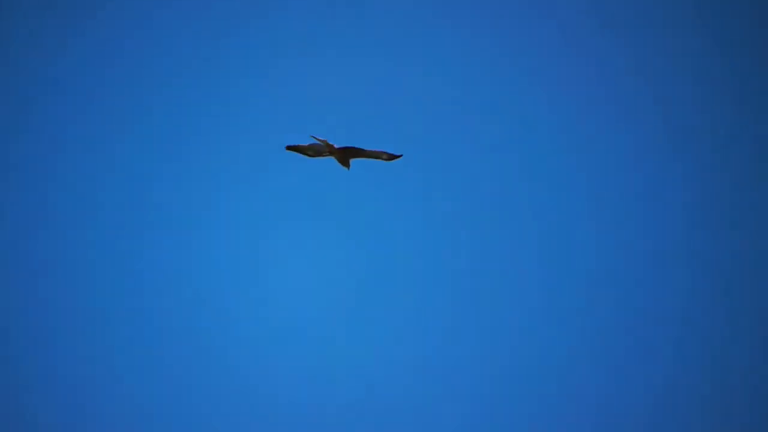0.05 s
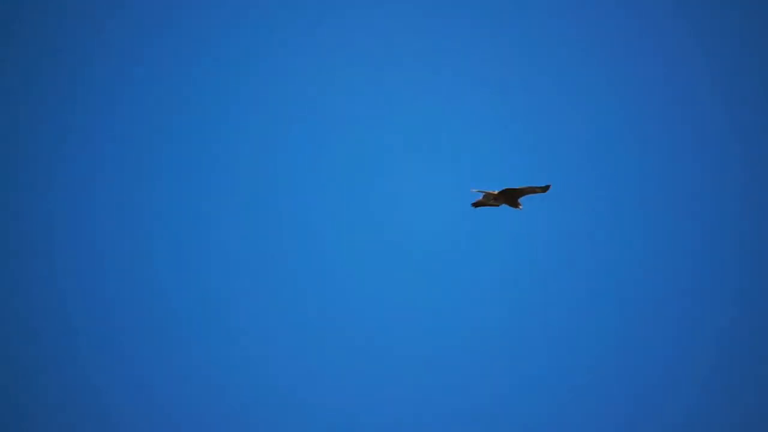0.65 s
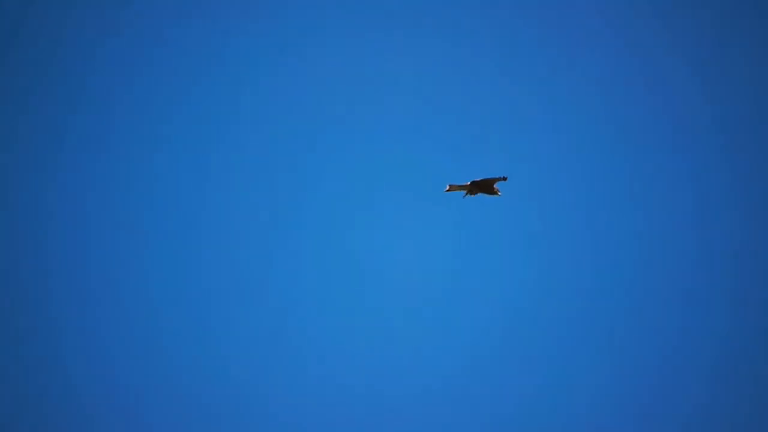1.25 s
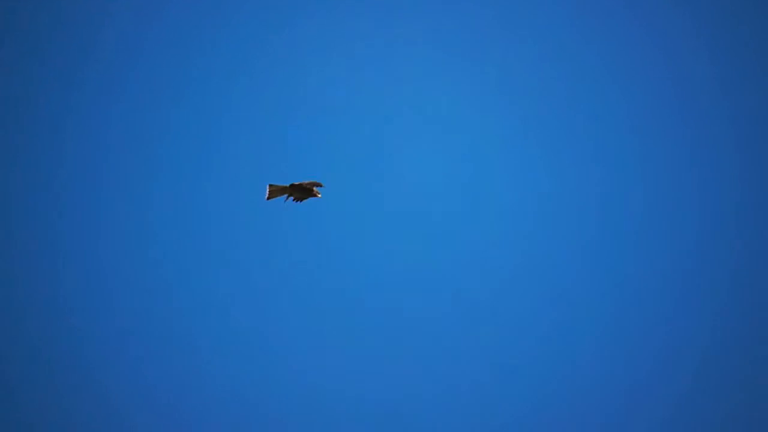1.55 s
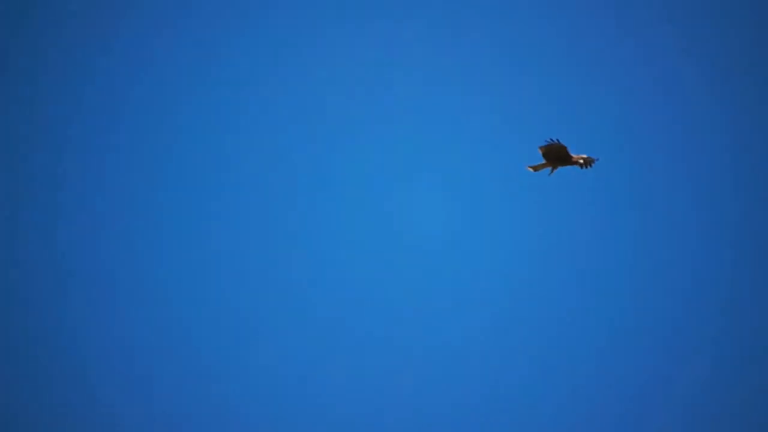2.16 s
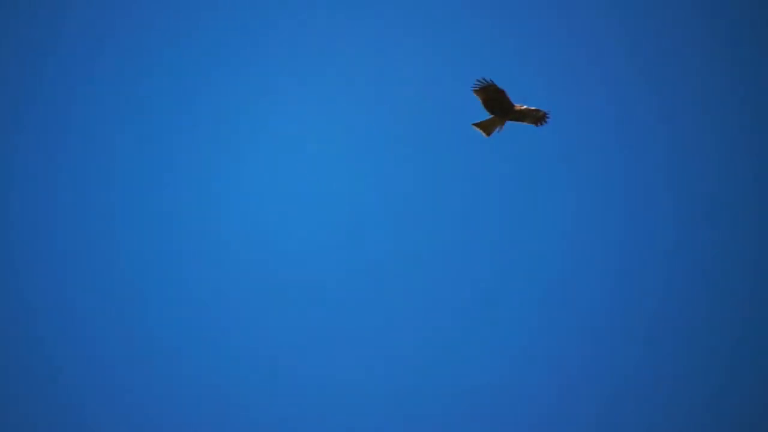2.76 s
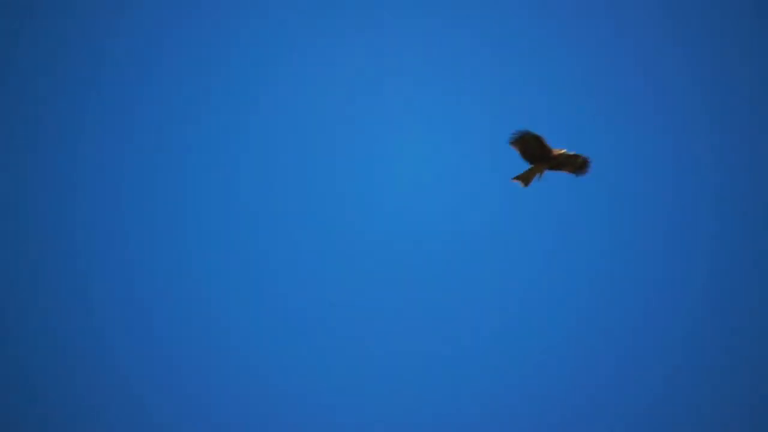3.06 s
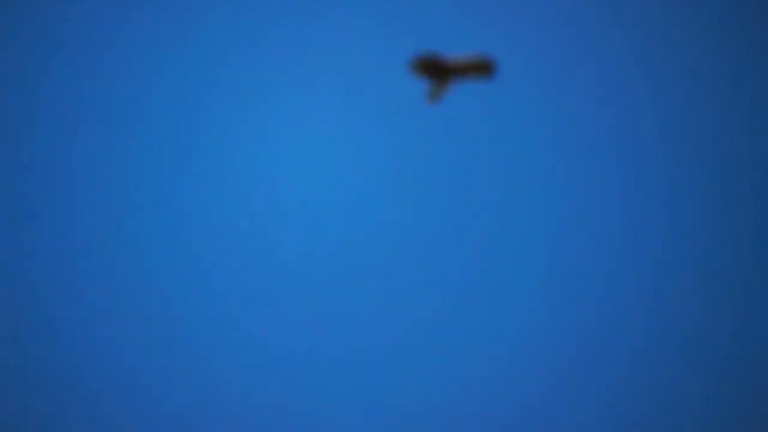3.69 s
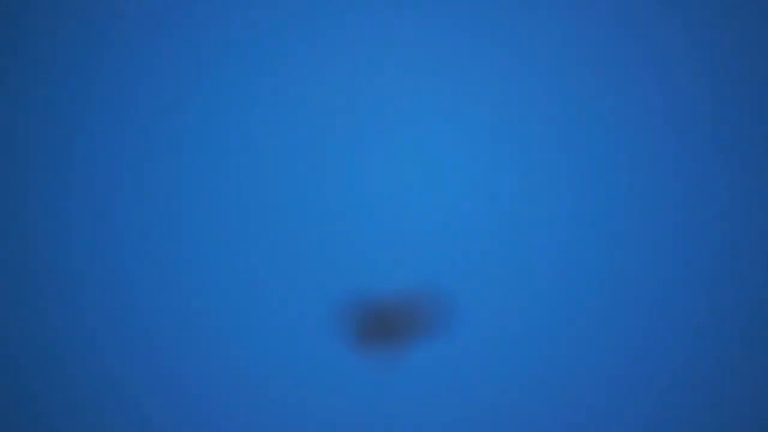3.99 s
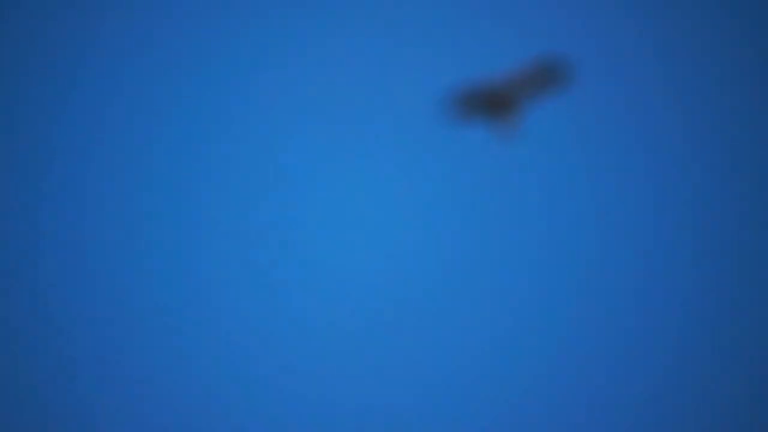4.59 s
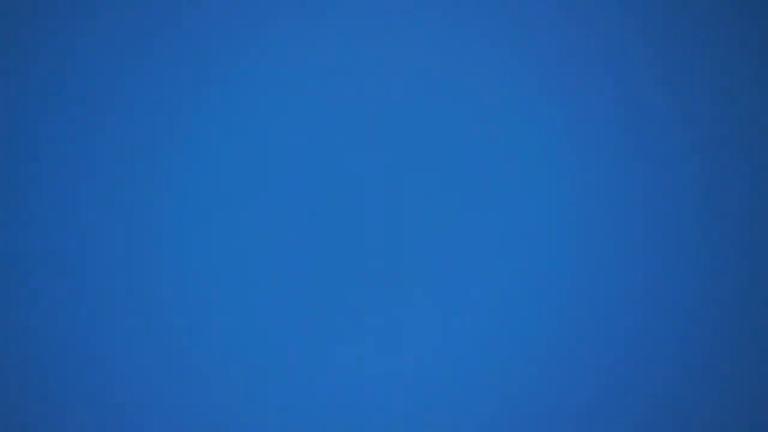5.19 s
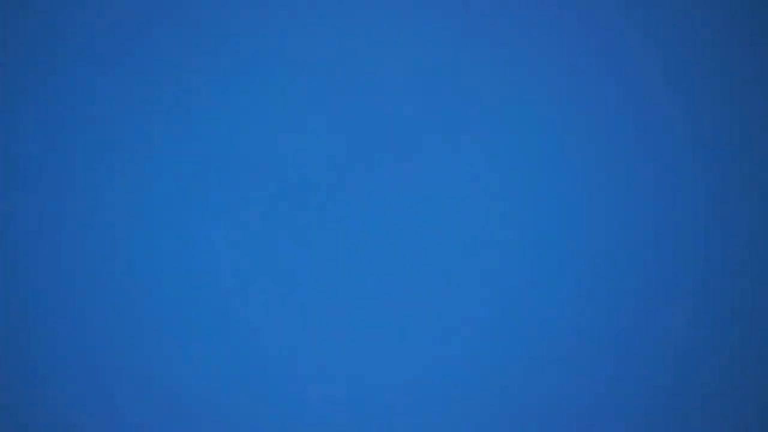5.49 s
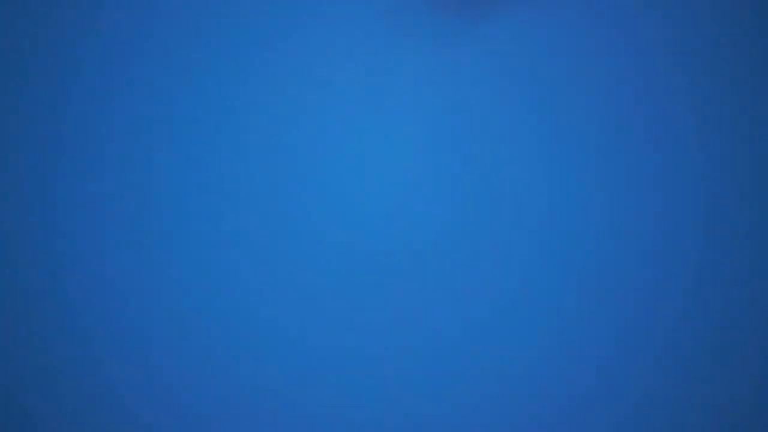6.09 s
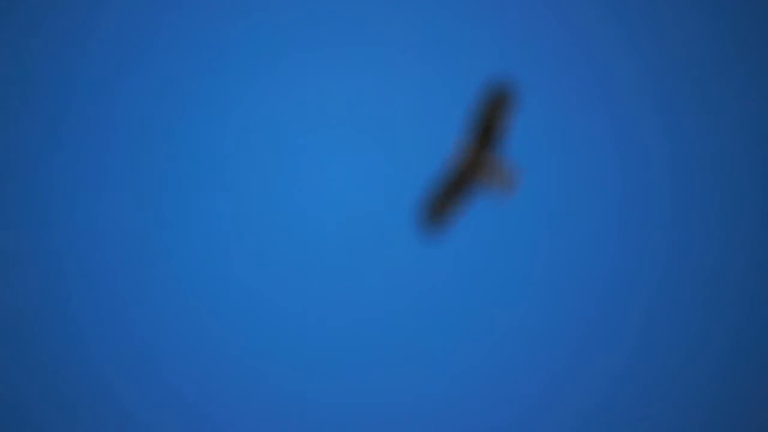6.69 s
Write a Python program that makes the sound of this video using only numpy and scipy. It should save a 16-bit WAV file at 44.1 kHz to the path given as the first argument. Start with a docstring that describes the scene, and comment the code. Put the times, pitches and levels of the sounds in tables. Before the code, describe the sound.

Strong wind buffets the microphone outdoors with a low, crackling roar that surges and dips in uneven gusts.

```python
"""A low, crackling roar: strong wind buffets the microphone of a camera under an open sky.
Turbulent eddies rush and knock at the port, brightening in each gust, over a deep heave of air.
The highest pressure peaks overload the input and are clipped, which makes the crackle.
For a moment, vortices shed from an edge whistle thinly.
The recorder notches out mains hum and passes only a narrow band."""
import sys
import numpy as np
from scipy import signal
from scipy.fft import rfft, irfft
from scipy.io import wavfile
from scipy.ndimage import uniform_filter1d, minimum_filter1d

SR = 44100
rng = np.random.default_rng(int(sys.argv[2]) if len(sys.argv) > 2 else 0)


def master(y):
    """Save y as 16-bit WAV."""
    cut = np.clip(np.atleast_2d(y).T, -1, 1)
    pcm = np.round(cut * 32767)  # scale
    wavfile.write(sys.argv[1], SR, pcm.astype(np.int16))


N = 302085
TIME = np.arange(N) / SR

# Wind strength, heard as the rush of small eddies: time_s, relative_level_db
WIND = [(0, -26), (0.5, -24.5), (0.68, -30), (1.17, -26), (1.32, -27), (1.6, -29.5), (1.85, -23),
        (2.3, -25.5), (2.52, -29.5), (2.68, -25.5), (3.1, -38), (3.95, -37.5), (4.5, -29), (4.85, -32),
        (5.3, -26), (5.85, -28), (6.25, -29), (6.85, -25)]
# How squarely the wind meets the port: time_s, share_0_to_1
HEAD_ON = [(0, 1), (1.0, 0.88), (2.4, 0.96), (3.0, 0.7), (3.6, 0.12), (4.5, 0.16), (5.5, 0.1), (6.85, 0.05)]
# Gusts at the port: middle_s, length_s, roar_gain_db, rush_gain_db
GUSTS = [(.652, 0.02, 6, 0.5), (.72, 0.1, 2.5, 6), (1.02, 0.041, 2, 5), (1.15, 0.057, 3.5, 2),
         (1.21, 0.025, 3.5, 2), (1.49, 0.031, 5.5, 0.5), (1.81, 0.051, 1.5, 3), (1.92, .07, 1, 0.5),
         (2.045, 0.08, 2.5, 2.5), (2.19, .07, -3.5, 3.5), (2.315, 0.07, 4, 7.5), (2.435, 0.042, -3.5, 1.5),
         (2.803, 0.052, 0, -4), (2.924, 0.024, 7, 6), (3.014, 0.05, -1, 6), (3.18, 0.12, -1, 1.5),
         (3.43, 0.068, 3, 4.5), (3.793, 0.025, 0, 9), (3.865, 0.057, 0, 8.5), (3.982, 0.017, 5, 0.5),
         (4.046, 0.022, 2.5, 5.5), (4.175, 0.18, -3.5, 6), (4.225, 0.07, 8.5, 2), (4.436, 0.055, 2.5, 3.5),
         (4.55, 0.051, -1, 3), (4.663, 0.047, 6, 7.5), (4.909, 0.049, 5, 12), (5.275, 0.053, 7, 4),
         (5.372, 0.021, 6, 3), (5.487, 0.039, 2, 5), (5.553, 0.021, 0, 3.5), (5.72, 0.1, -4, 6.5),
         (5.87, 0.049, 0, 3.5), (5.965, 0.025, -2.5, 6), (6.175, 0.018, -1.5, 3.5), (6.228, 0.02, 1, 6.5),
         (6.436, 0.057, -2, 4), (6.51, 0.032, 2.5, 1), (6.61, 0.066, -4, 2), (6.688, 0.027, -1.5, 4.5),
         (6.79, 0.26, 0.5, 1.5)]
# Brief dips and lifts in the wind's roar and rush (a negative loss is a lift):
# middle_s, length_s, roar_loss_db, rush_loss_db
DIPS_AND_LIFTS = [(.588, 0.022, 0, 5), (.669, 0.023, 5.5, 9.5), (.88, 0.13, 5.5, 1), (1.068, 0.049, 1, 2),
                  (1.255, 0.032, 2, 9.5), (1.544, 0.046, 1.5, 3.5), (2.135, .04, 0.5, 1),
                  (2.363, 0.051, 6, 1), (2.55, 0.044, 7.5, 3.5), (2.864, 0.067, 6.5, 0),
                  (2.958, 0.049, 9.5, 0.5), (3.36, 0.15, 4, 3.5), (3.519, 0.038, 11, 0),
                  (3.72, 0.072, 1.5, 5), (3.902, 0.035, 4, 0), (4.014, 0.026, 4, 13),
                  (4.101, 0.059, 2, 2.5), (4.29, 0.15, 5, 2), (4.765, 0.077, 2, -1.5),
                  (4.975, 0.12, 1.5, 6), (5.315, 0.056, 2.5, 0.5), (5.42, 0.026, 5.5, -2),
                  (5.615, 0.084, -1, 4), (6.025, 0.033, 3.5, 0.5), (6.083, 0.18, 1, 21.5),
                  (6.205, .02, -4, 5), (6.248, .022, -1, 0), (6.36, 0.027, 6, 7.5), (6.565, 0.021, 0, 6.5),
                  (6.648, 0.05, 5, 2.5), (6.84, 0.035, 3, 0.5)]
# Spectra of large, small and finest eddies: frequency_hz, relative_density_db
ROAR_GLANCING_COLOUR = [(20, -32.5), (35, -35.5), (60, -4), (100, -3), (150, 0.5), (220, 2.5), (320, 0),
                        (500, -6), (750, -12), (1000, -22), (2000, -46), (3000, -74.5), (7000, -78)]
ROAR_HEAD_ON_COLOUR = [(20, -26.5), (50, -9), (100, -9.5), (160, -3), (230, -1), (370, -1.5), (500, -7.5),
                       (750, -15.5), (1000, -22.5), (2000, -43), (3000, -69), (7000, -92.5)]
RUSH_GLANCING_COLOUR = [(150, -20.5), (350, 1), (550, 9.5), (800, 6.5), (1100, 3), (1500, -5.5),
                        (2000, -14.5), (3000, -43.5), (4500, -50.5), (7000, -59.5)]
RUSH_HEAD_ON_COLOUR = [(150, -34.5), (350, 1.5), (550, 4), (800, 2), (1100, -1), (1500, -6), (2000, -15.5),
                       (3000, -44), (4500, -55), (7000, -60.5)]
FIZZ_COLOUR = [(1000, -3.5), (2000, 10.5), (2600, 5), (3500, -6.5), (5000, -20.5), (7000, -42.5)]
# Base overload threshold, lower in a head-on wind: time_s, ceiling_db
CEILING = [(0, -10), (.5, -11.5), (.9, -9.8), (1.3, -10), (1.6, -10.5), (2.0, -8.5), (2.35, -11), (2.7, -9),
           (3.0, -8.5), (3.4, -3.5), (4.45, -8), (4.62, -7), (5.15, -6), (5.95, -5.5), (6.15, -2.5),
           (6.28, -2.5), (6.42, -7), (6.85, -6)]
# Slow shoves of air on the diaphragm: middle_s, length_s, gain_db
SHOVES = [(.25, 0.92, 5), (2.88, 0.15, -2.5), (3.85, 0.12, 6), (4.45, 0.11, 20.5), (4.66, 0.2, 10),
          (5.2, 0.13, 25)]
# Spectra of the heave, open air and faint noise near 12 kHz: frequency_hz, relative_density_db
HEAVE_COLOUR = [(1, -10.5), (4, -2), (10, -11.5), (20, -11.5), (35, -23), (60, -20), (150, -40.5),
                (400, -59), (1000, -110)]
AIR_COLOUR = [(200, 7.5), (2000, -1.5), (4000, -4), (7000, -17.5)]
HISS_COLOUR = [(8300, 0.5), (10000, -13), (12000, 1.5), (14000, -12.5)]
# The loudest overload pops: start_s, relative_treble_peak_db
POPS = [(0.137, -33), (0.172, -31), (0.21, -30), (0.458, -32), (0.491, -27.5), (0.608, -32), (0.639, -33.5),
        (0.708, -31), (1.949, -32), (2.325, -27.5), (2.414, -33.5), (2.4272, -36), (2.436, -32.5),
        (2.518, -34), (2.664, -38), (2.731, -33), (2.744, -38), (2.757, -39.5), (2.763, -36), (2.814, -36),
        (2.914, -36), (2.9235, -38), (3.0893, -41.5), (3.0966, -40), (3.1352, -38), (3.2443, -38),
        (3.558, -42), (3.6897, -37.5), (3.8499, -34.5), (3.872, -38), (3.938, -37.5), (3.99, -47.5),
        (4.153, -48.5), (4.184, -35.5), (4.225, -39.5), (4.2443, -38), (4.3827, -37), (4.442, -35.5),
        (4.446, -34.5), (4.5514, -41.5), (4.563, -36), (4.5782, -37.5), (4.603, -33.5), (4.624, -37),
        (4.6551, -38.5), (4.664, -35.5), (4.672, -38.5), (4.69, -38), (4.7812, -37.5), (4.886, -43),
        (4.9188, -35.5), (4.9883, -36.5), (5.025, -38.5), (5.041, -41), (5.051, -39.5), (5.063, -36),
        (5.114, -37.5), (5.1966, -37), (5.236, -39), (5.245, -40), (5.257, -35.5), (5.266, -39),
        (5.273, -33.5), (5.28, -46.5), (5.3692, -29.5), (5.414, -38), (5.47, -39), (5.482, -36.5),
        (5.4913, -34), (5.555, -37.5), (5.558, -40.5), (5.617, -46), (5.6823, -38), (5.72, -36.5),
        (5.756, -35.5), (5.867, -35), (5.925, -37.5), (5.9871, -37), (5.993, -39.5), (6.2188, -40),
        (6.223, -41.5), (6.263, -43), (6.2878, -33), (6.338, -42), (6.398, -35), (6.5085, -36),
        (6.522, -38.5), (6.69, -34), (6.695, -37.5), (6.758, -35.5), (6.804, -38), (6.835, -39)]
# Single eddies striking the port: time_s, relative_peak_db, pitch_hz
KNOCKS = [(0.646, -15, 684), (1.077, -4.5, 508), (1.341, -7.5, 530), (1.564, -12.5, 520),
          (2.262, -9.5, 777), (3.805, -4.5, 720), (3.973, -13.5, 486), (4.044, -12, 400), (6.16, -13, 514),
          (6.74, -12.5, 621)]
# Short whistles on an edge: middle_s, length_s, top_pitch_hz, relative_level_db
EDGE_TONES = [(2.508, 0.13, 2250, -42.5), (2.873, 0.25, 2216, -44), (3.01, 0.13, 2144, -48.5),
              (3.131, 0.17, 2225, -42.5), (3.242, 0.16, 2305, -41.5), (3.355, .12, 2140, -47.5),
              (3.467, 0.06, 2240, -46), (3.588, 0.02, 1980, -39), (3.794, 0.048, 2200, -41),
              (4.037, 0.025, 2020, -40), (4.32, .02, 2080, -43), (4.365, 0.02, 2030, -40)]
# Treble lift of the recorder: frequency_hz, gain_db
RESPONSE = [(1500, 0), (3000, 2), (4200, 2.5), (6500, 2.5)]
# Right channel relative to left: frequency_hz, gain_db, phase_lead_rad
RIGHT_CHANNEL = [(11, -13.7, .4), (22, -11.4, .65), (43, -5.7, .71), (86, -1.6, .42), (150, -.6, .27),
                 (300, -.3, .15), (420, -.15, .11), (700, 0, 0), (2000, 0, 0), (2800, 0, -.07),
                 (6500, 0, -.13)]
# Mains hum filter: centre_hz, width_hz
HUM_NOTCHES = [(57.5, 51), (119.5, 28.5), (179, 19.3)]


def gain_of(db):
    """Decibels to amplitude."""
    return 10 ** (np.asarray(db) / 20)


def unit_rms(x):
    """Normalisation to an rms of 1."""
    return x / np.sqrt(np.mean(x ** 2) + 1e-20)


def curve(rows):
    """Linear interpolation of (time_s, value) rows."""
    return np.interp(TIME, *np.transpose(rows))


def add(mix, start_s, sound):
    """Superposition of a sound on the mix."""
    part = mix[max(round(start_s * SR), 0):][:len(sound)]
    part += sound[:len(part)]


def coloured(x, colour):
    """Spectral shaping by (frequency_hz, gain_db) rows."""
    hz, (row_hz, db) = np.fft.rfftfreq(N, 1 / SR), np.transpose(colour)
    return irfft(rfft(x) * gain_of(np.interp(np.log(hz + 1), np.log(row_hz + 1), db)), N)


def noise(colour):
    """Gaussian noise of rms 1 with the given spectrum."""
    return unit_rms(coloured(rng.standard_normal(N), colour))


def blended(glancing, head_on, share):
    """Equal-power crossfade: independent noises add in power."""
    return np.sqrt(1 - share) * noise(glancing) + np.sqrt(share) * noise(head_on)


def wander(rate_hz):
    """Random fluctuation of rms 1, low-passed at the rate."""
    hz = np.fft.rfftfreq(N, 1 / SR)
    return unit_rms(irfft(rfft(rng.standard_normal(N)) / (1 + (hz / rate_hz) ** 4), N))


def steadied(x, samples, floor=1e-12):
    """Division by the running rms removes slow drift and keeps quick lumps."""
    return x / np.sqrt(uniform_filter1d(abs(x) ** 2, samples) + floor)


def tremble(width_hz):
    """Line broadening: random amplitude and phase smear a tone."""
    return steadied(wander(width_hz) + 1j * wander(width_hz), samples=1500, floor=1e-9)


def swells(rows, order=2):
    """Summed bell curves, one track per dB column; higher orders have flatter tops."""
    out = np.zeros((len(rows[0]) - 2, N))
    for middle_s, length_s, *db in rows:
        near = abs(TIME - middle_s) < 2 * length_s
        out[:, near] += np.outer(db, np.exp(-abs(2 * (TIME[near] - middle_s) / length_s) ** order))
    return out


def eddies(roar_db=-14.4, rush_db=6.5, fizz_db=-19, head_on_db=2, fizz_growth=1.21,
           flutter_db=1.5, lumps_db=2.14, veer=0.12):
    """Turbulence: large eddies roar, small ones rush, and the finest grow fastest in a gust."""
    roar_lift_db, rush_lift_db = swells(GUSTS) - swells(DIPS_AND_LIFTS, order=4)
    gust_db = curve(WIND) + rush_lift_db
    mean_db = gust_db.mean()
    flicker_db = flutter_db * wander(rate_hz=45)
    head_on = curve(HEAD_ON)
    facing_db = head_on_db * head_on  # head on, roar and fizz gain while the rush thins
    veering = np.clip(head_on + veer * wander(rate_hz=7), 0, 1)  # shifts the roar in pitch
    large = blended(ROAR_GLANCING_COLOUR, ROAR_HEAD_ON_COLOUR, veering)
    small = blended(RUSH_GLANCING_COLOUR, RUSH_HEAD_ON_COLOUR, head_on) * gain_of(flicker_db)
    large_db = roar_db + facing_db + roar_lift_db + lumps_db * wander(rate_hz=14)
    roar = gain_of(large_db) * steadied(large, samples=2000)
    rush = gain_of(gust_db + rush_db - facing_db) * steadied(small, samples=2500)
    fine_db = mean_db + fizz_db + facing_db + fizz_growth * (gust_db - mean_db + flicker_db)
    return roar + rush + gain_of(fine_db) * noise(FIZZ_COLOUR)


def limiter(pressure, knee_db=-9, squeeze=0.57):
    """Dynamic compression: the gain falls quickly as peaks exceed the knee."""
    peak_db = 20 * np.log10(1e-6 - minimum_filter1d(-abs(pressure), size=300))
    excess_db = np.maximum(peak_db - knee_db, 0)
    smooth_db = uniform_filter1d(uniform_filter1d(excess_db, size=220), size=220)
    return pressure * gain_of(-squeeze * smooth_db)


def overload(pressure, suction_db=1.5, sputter_db=1.58, relief=0.27):
    """Asymmetric clipping: pushes are cut sooner than pulls, and each sharp corner crackles."""
    rush_loss_db = swells(DIPS_AND_LIFTS, order=4)[1]
    ceiling = gain_of(curve(CEILING) + relief * rush_loss_db)  # dips in the rush restore headroom
    surge = gain_of(sputter_db * np.clip(wander(rate_hz=38), -2, 2))  # passing eddies use it up
    return np.clip(pressure * surge, -ceiling * gain_of(suction_db), ceiling) / np.sqrt(surge)


def heave(base_db=-50, head_on_db=27, drift_db=4.5):
    """Dynamic pressure: air shoves the diaphragm slowly, harder when the wind is head on."""
    level_db = base_db + head_on_db * curve(HEAD_ON) + swells(SHOVES)[0] - drift_db * wander(rate_hz=5)
    return gain_of(level_db) * steadied(noise(HEAVE_COLOUR), samples=16000)


def open_air(level_db=-68):
    """Ambient noise floor: the faint, steady hiss of open air."""
    return gain_of(level_db) * noise(AIR_COLOUR)


def pops(trim_db=-1, corner_hz=1400, stray_per_s=30, stray_db=-46.5, spread_db=1.5, stray_growth=3):
    """A slope discontinuity is broadband: a lone peak kinks at the ceiling and ticks."""
    t = np.arange(400) / SR
    kink = t * np.exp(-2 * np.pi * corner_hz * t)
    treble = signal.butter(4, [4000, 7500], "bandpass", fs=SR, output="sos")
    kink /= abs(signal.sosfilt(treble, kink)).max()
    wind_db = curve(WIND) + swells(GUSTS)[1] - swells(DIPS_AND_LIFTS, order=4)[1]
    activity = gain_of(wind_db) ** stray_growth  # strong wind scatters more weak ticks
    rate = stray_per_s * activity / activity.mean()
    hits = (rng.random(N) < rate / SR) * gain_of(stray_db + spread_db * rng.standard_normal(N))
    for start_s, db in POPS:
        add(hits, start_s, gain_of([db + trim_db]))
    return -signal.oaconvolve(hits, kink)[:N]


def knocks(flow, trim_db=0.5, cycles=0.51, delay_s=.002, stall_db=6.5, stall_s=0.0075, lead_s=0.0059):
    """Pressure impulse: the flow stalls, then one eddy strikes the port with a hollow knock."""
    t = np.arange(-200, 200) / SR
    stalls = [(time_s - lead_s, stall_s, stall_db) for time_s, _, _ in KNOCKS]
    out = flow * gain_of(-swells(stalls, order=4)[0])
    for time_s, db, hz in KNOCKS:
        pulse = np.cos(2 * np.pi * hz * t) * np.exp(-(2 * hz * t / cycles) ** 2)
        add(out, time_s + delay_s + t[0], -gain_of(db + trim_db) * pulse)
    return out


def edge_whistle(trim_db=0.5, octave_db=-31, settle_s=0.13, sag=0.036):
    """Vortex shedding: uneven flow off an edge sings a fuzzy tone with a faint octave."""
    out = np.zeros(N)
    core, skirt = tremble(width_hz=42), tremble(width_hz=230)
    octave = gain_of(octave_db) * tremble(width_hz=260)
    for middle_s, length_s, top_hz, db in EDGE_TONES:
        at = np.flatnonzero(abs(TIME - middle_s) < length_s / 2)
        arch = np.cos(np.pi * (TIME[at] - middle_s) / length_s)  # pitch and level follow it together
        pitch_hz = top_hz * (1 - sag * (1 - arch))
        phasor = np.exp(2j * np.pi * np.cumsum(pitch_hz) / SR)
        fundamental = core[at] + settle_s / length_s * skirt[at]  # short tones cannot settle: rougher
        tone = (fundamental * phasor + octave[at] * phasor ** 2).real
        out[at] += gain_of(db + trim_db) * arch * unit_rms(tone)
    return out


def scene():
    """Superposition at one port: the same pressure feeds both channels."""
    pressure = knocks(limiter(eddies())) + edge_whistle()
    return np.tile(overload(pressure) + pops() + heave() + open_air(), (2, 1))


def record(dry, band_edge_hz=7350, hiss_db=-88, hiss_top_hz=15600):
    """Linear filtering: treble lift, less bass on the right, hum notches, a band limit; then faint noise around
    12 kHz."""
    left, right = coloured(dry, RESPONSE)
    log_hz = np.log(np.fft.rfftfreq(N, 1 / SR) + 1)
    row_hz, gain_db, lead_rad = np.transpose(RIGHT_CHANNEL)
    right_gain = gain_of(np.interp(log_hz, np.log(row_hz), gain_db))
    right_phase = np.interp(log_hz, np.log(row_hz), lead_rad)
    pair = np.array([left, irfft(rfft(right) * right_gain * np.exp(1j * right_phase), N)])
    for hz, width_hz in HUM_NOTCHES:
        pair = signal.lfilter(*signal.iirnotch(hz, hz / width_hz, fs=SR), pair)
    pair *= np.minimum(TIME / .002, 1)  # 2 ms fade-in
    band_limit = signal.firwin(71, band_edge_hz, window=("kaiser", 4), fs=SR)
    pair = signal.oaconvolve(pair, band_limit[None], "same")
    pair += gain_of(hiss_db) * noise(HISS_COLOUR)
    hiss_limit = signal.firwin(255, hiss_top_hz, window=("kaiser", 9), fs=SR)
    return signal.oaconvolve(pair, hiss_limit[None], "same")


dry = scene()
out = record(dry)
master(out)
```